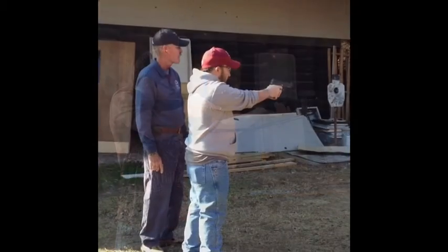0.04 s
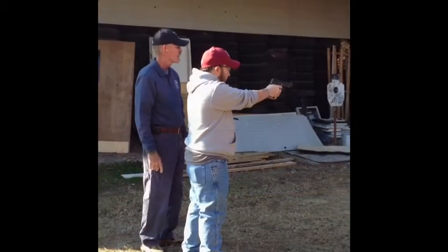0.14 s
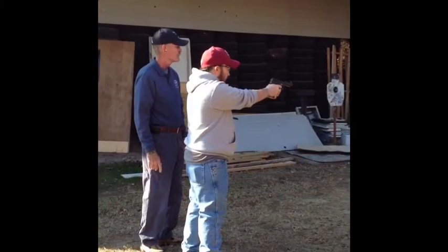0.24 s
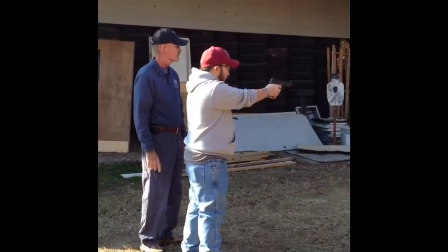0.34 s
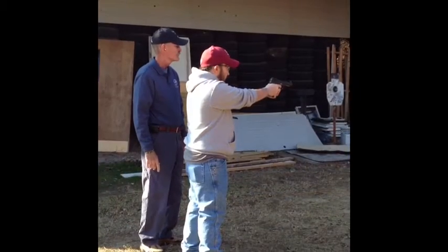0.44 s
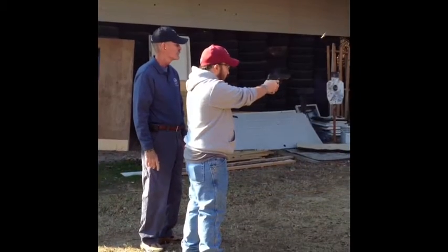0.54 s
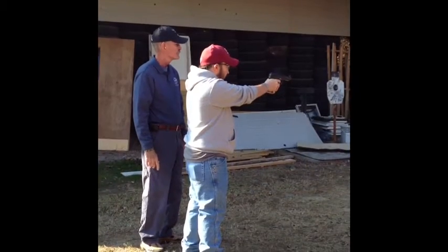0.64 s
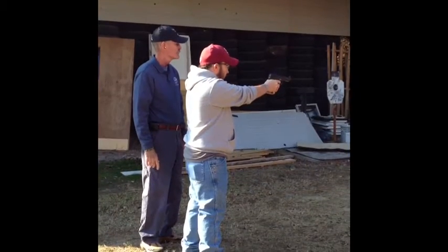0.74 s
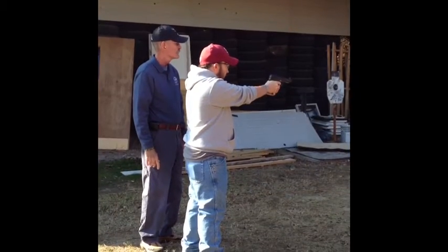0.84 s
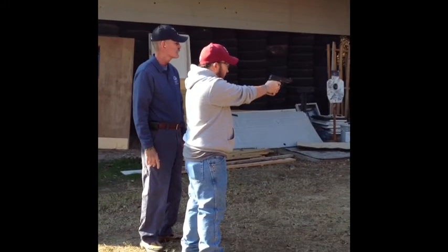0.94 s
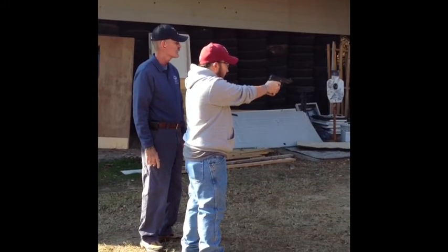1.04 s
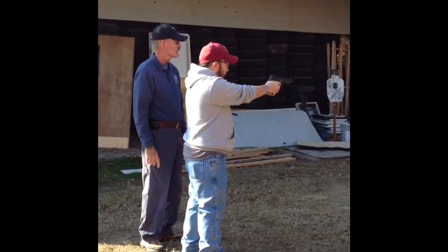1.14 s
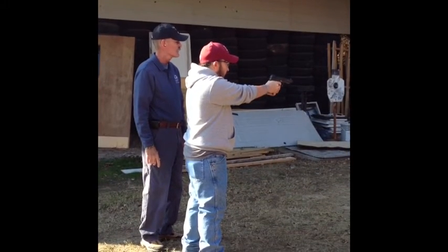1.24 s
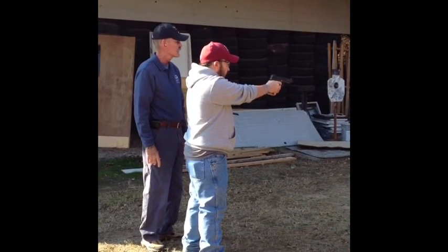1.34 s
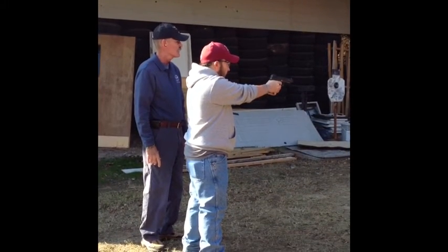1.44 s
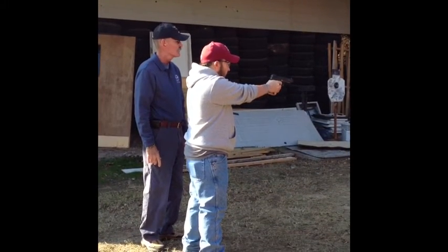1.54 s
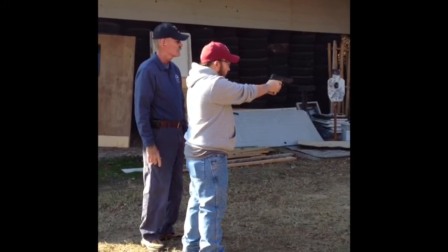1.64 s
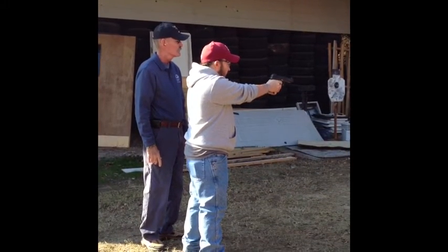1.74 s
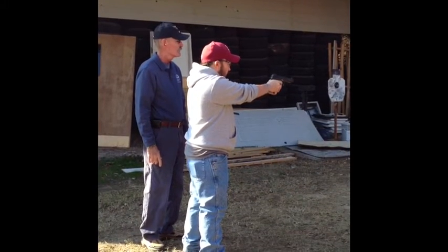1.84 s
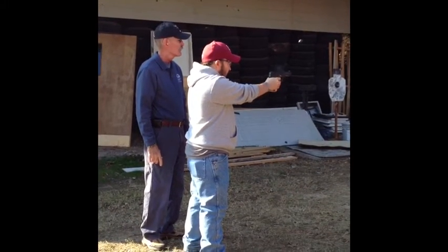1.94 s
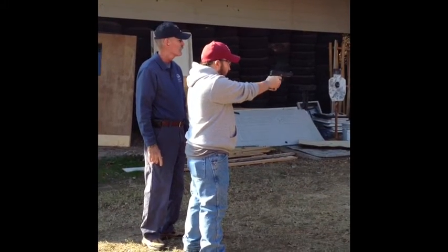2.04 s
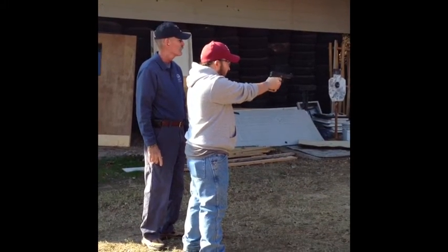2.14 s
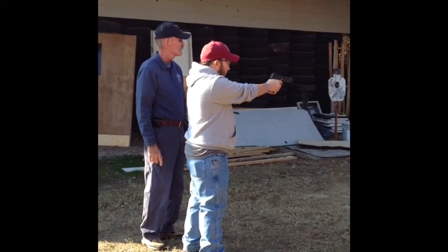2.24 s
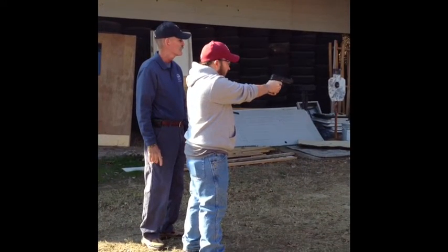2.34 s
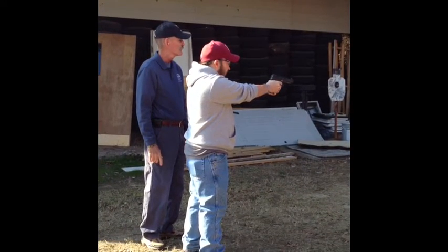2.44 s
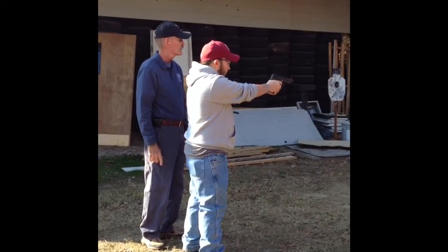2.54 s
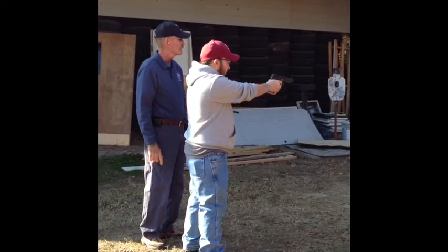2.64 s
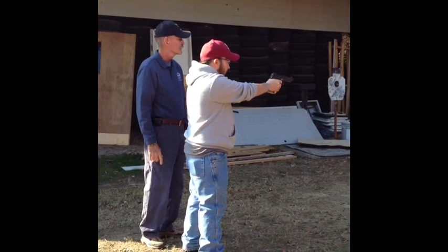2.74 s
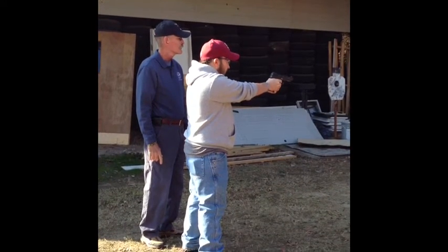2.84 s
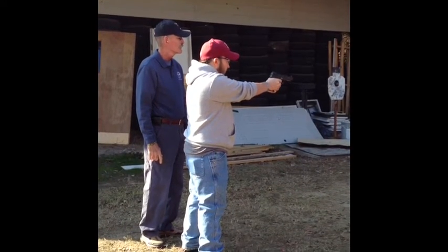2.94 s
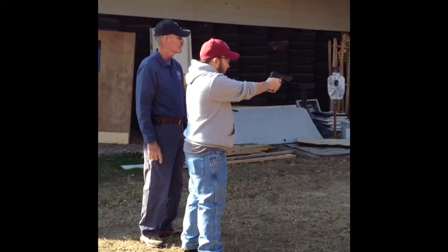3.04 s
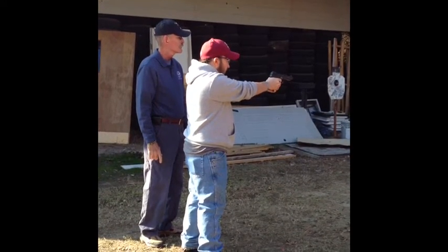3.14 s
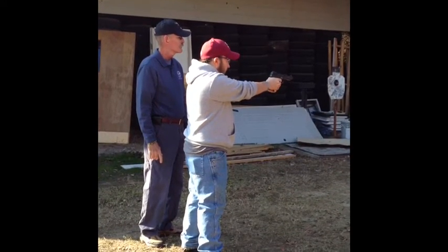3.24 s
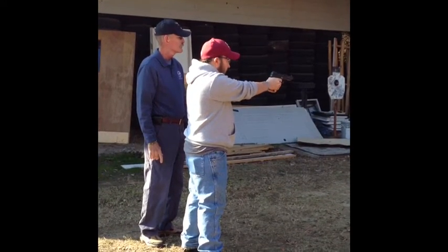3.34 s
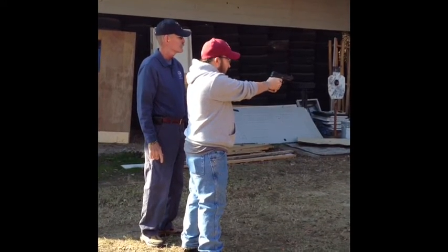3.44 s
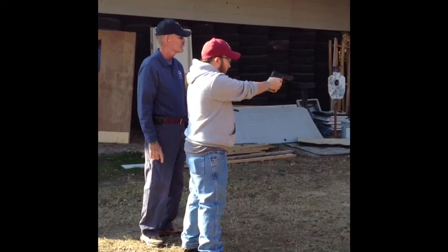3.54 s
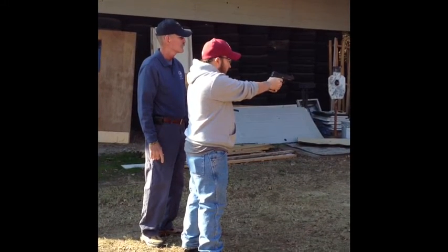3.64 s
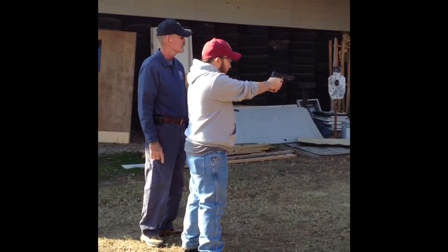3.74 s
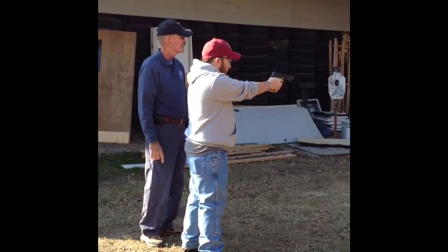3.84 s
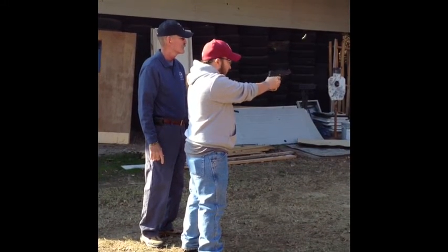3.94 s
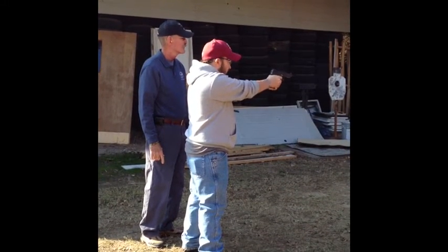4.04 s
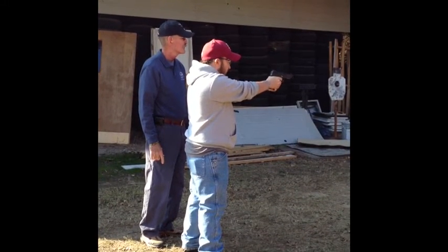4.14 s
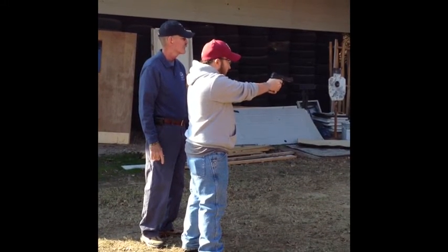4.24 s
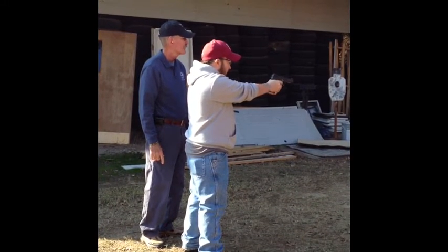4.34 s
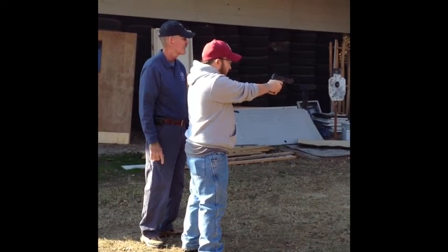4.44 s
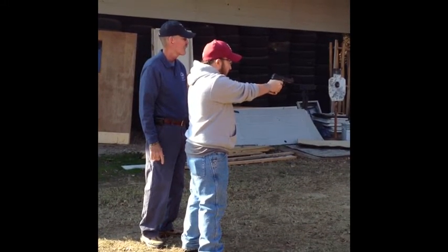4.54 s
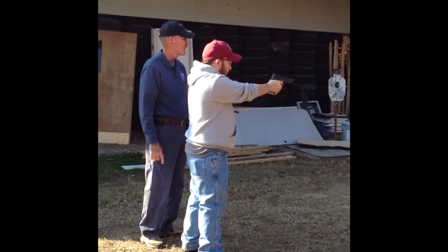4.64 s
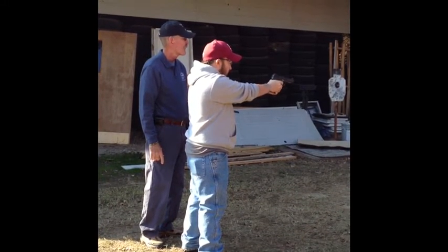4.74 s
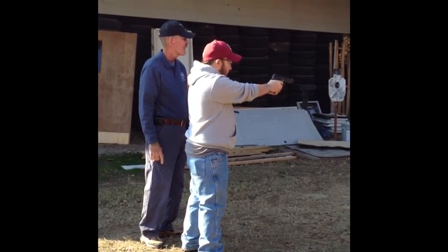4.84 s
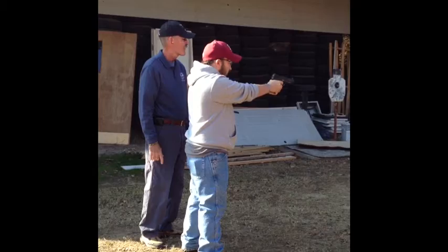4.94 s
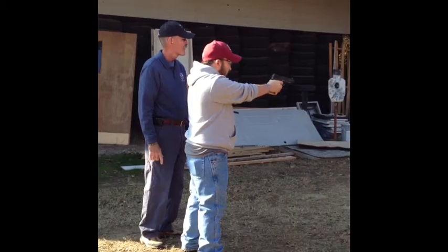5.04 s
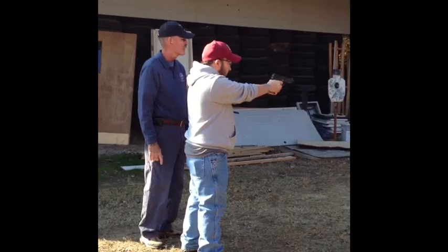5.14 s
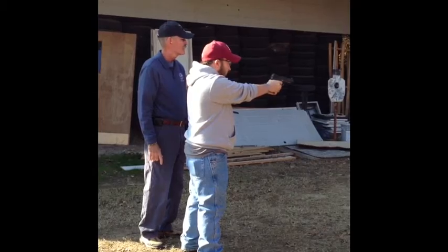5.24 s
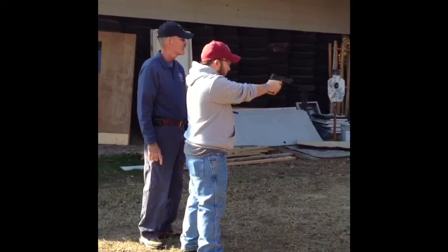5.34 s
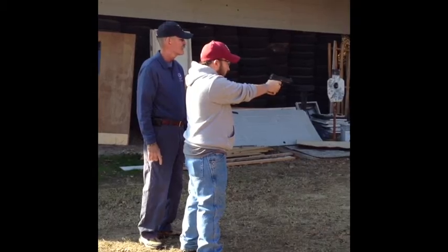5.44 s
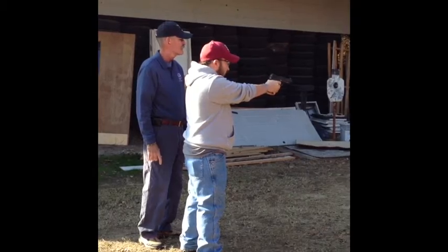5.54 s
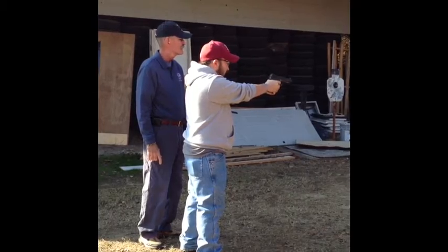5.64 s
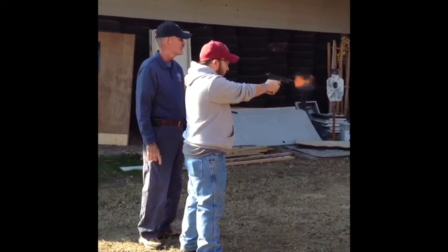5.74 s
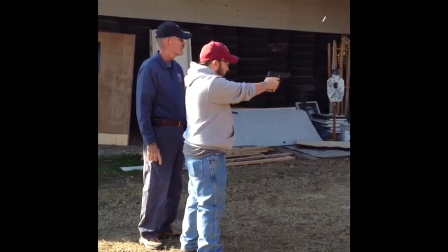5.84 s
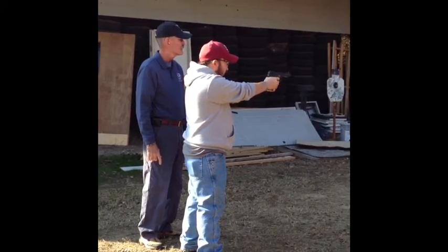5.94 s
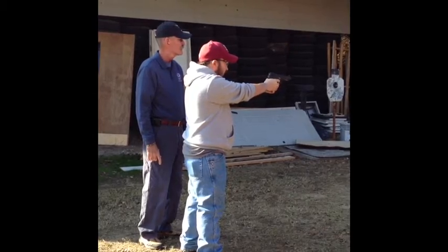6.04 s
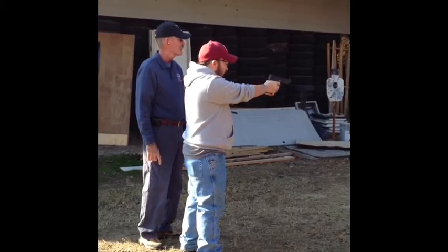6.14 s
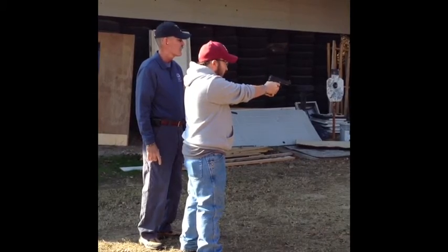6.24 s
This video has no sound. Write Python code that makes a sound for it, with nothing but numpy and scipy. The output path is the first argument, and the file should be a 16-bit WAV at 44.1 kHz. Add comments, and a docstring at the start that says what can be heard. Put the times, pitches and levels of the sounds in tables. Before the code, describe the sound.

A handgun fires four spaced shots on a quiet outdoor range, each loud crack trailed by a soft far-off echo.

```python
"""Outdoor range, in front of an open wooden shed: four pistol shots a few metres away.
Each muzzle blast bounces off the ground, slaps back from the shed, rings low in closely spaced echoes
and scatters round the yard; 0.4 s later a dull echo returns over the grass from the far side.
Between shots: near-still air, a faint drone, two soft knocks. Gain control ducks on each blast."""
import sys
import numpy as np
from scipy import signal
from scipy.fft import rfft, irfft
from scipy.io import wavfile
from scipy.ndimage import uniform_filter1d, minimum_filter1d

SR = 44100
rng = np.random.default_rng(int(sys.argv[2]) if len(sys.argv) > 2 else 0)


def inscribe(sig):
    """Save sig as 16-bit PCM at rate SR to the path in sys.argv[1].

    A 1-D sig is mono; a 2-D sig holds one channel per row.
    Samples are clipped to [-1, 1] before scaling.
    """
    pcm = np.round(np.clip(np.atleast_2d(sig).T, -1, 1) * 32767)
    wavfile.write(sys.argv[1], SR, pcm.astype(np.int16))


N = 277830
AGE_S = np.arange(int(1.5 * SR)) / SR  # time since an event's onset

# yard scatter spectrum: f/Hz, relative density/dB
YARD_SPECTRUM = [(30, -25), (75, -21), (125, -0.5), (280, 1.5), (470, -5.5), (780, -1), (1000, -4),
                 (1300, -13), (1650, -24.5), (2400, -25), (4000, -32), (7000, -34.5), (10000, -46.5),
                 (15000, -46.5)]


def muzzle_blast(crack_db, push_s=0.00019, body_hz=500, body_db=-4.5, front_db=-18, base_crack_db=-22):
    """Steep pressure front with suction behind it; a short bright crackle of overload on the front."""
    # blast resonances: f/Hz, width/Hz, boost/dB
    peaks = [(99, 45, 9), (153, 65, 13.5), (312, 130, 18), (828, 210, 17.5), (1295, 150, 6), (1815, 150, 6),
             (3160, 790, 6)]
    # crack spectrum: f/Hz, relative density/dB
    crack_spectrum = [(30, -2.5), (200, -0.5), (1200, 4.5), (1750, 4), (2500, -2), (3200, 0.5),
                      (5200, -1.5), (7500, -6.5), (10000, -22), (15000, -16)]
    phase = AGE_S / (push_s * from_db(rng.normal(0, .2)))
    front = (1 - phase) * np.exp(-np.minimum(phase, 60))
    front = signal.lfilter(*signal.butter(1, 40, "high", fs=SR), front + 1e-18)
    body = lowpass(front, body_hz)
    for hz, width_hz, boost_db in peaks:
        body = body + from_db(boost_db) * resonance(body, hz, width_hz)
    crack = noise(crack_spectrum) * swell(0, rise_s=.0001, t60_s=0.017)
    return from_db(body_db) * body + from_db(front_db) * front + from_db(base_crack_db + crack_db) * crack


def report(crack_db):
    """One blast with its discrete echoes: ground, shed, far side of the range."""
    # ground and close surfaces: delay/s, gain/dB, low-pass/Hz
    bounces = [(0.00252, -7.5, 11950), (0.00518, -1.5, 202.5)]
    # far-side echoes: delay/s, gain/dB, low-pass/Hz
    far_paths = [(0.3833, -42.5, 4500), (0.407, -28, 266), (0.4137, -32, 200)]
    blast = muzzle_blast(crack_db)
    near = blast + reflections(blast, bounces, highpass_hz=24.8)
    far = reflections(over_grass(near), far_paths, highpass_hz=189)
    return near + shed_echoes(near) + far


def shed_echoes(x, slap_s=.0209, slap_db=-8, slap_hz=1000, board_db=-11.5, board_hz=513):
    """The shed front slaps back first; boards and walls behind follow, duller and ever weaker."""
    gaps_s = .0034 * 1.172 ** np.arange(7)
    delays_s = slap_s + np.cumsum(gaps_s)
    boards = [(delay_s, board_db - 0.86 * k, board_hz) for k, delay_s in enumerate(delays_s)]
    return reflections(x, [(slap_s, slap_db, slap_hz)] + boards, highpass_hz=70)


def reflections(x, paths, highpass_hz):
    """Delayed, weaker, duller copies; the longest waves pass surfaces by."""
    out = np.zeros_like(x)
    returned = signal.sosfilt(signal.butter(2, highpass_hz, "high", fs=SR, output="sos"), x + 1e-18)
    for delay_s, gain_db, lowpass_hz in paths:
        add(out, delay_s, from_db(gain_db) * lowpass(returned, lowpass_hz))
    return out


def over_grass(x, dip_hz=790, thump_hz=390, air_hz=4000):
    """A long path low over grass absorbs the mids, favours a low thump and softens the top."""
    hollow = x - 0.74 * resonance(x, dip_hz, width_hz=420)
    thump = from_db(-1.5) * resonance(hollow, thump_hz, width_hz=170)
    return lowpass(hollow + thump, air_hz)


def echo_ring(gain_db=-1, arrival_s=.023, rise_s=0.0065):
    """Low pitched ringing of closely spaced echoes after each shot, as decaying sines."""
    # ring tones: f/Hz, relative level/dB, t60/s
    tones = [(116.3, -28, 0.099), (130, -24, 0.12), (166, -23, 0.22), (211.5, -21.5, 0.18),
             (239.3, -24, .22), (268.3, -18.5, 0.26), (332, -26, 0.14), (371.2, -31, 0.12),
             (636.6, -33, 0.31), (756, -27.5, 0.22), (823, -27, 0.12)]
    ring_s = np.maximum(AGE_S - arrival_s, 0)
    ring = sum(from_db(db) * np.sin(2 * np.pi * hz * ring_s) * swell(arrival_s, rise_s, t60_s)
               for hz, db, t60_s in tones)
    return from_db(gain_db) * ring


def yard_scatter(surfaces, gain_db=-25.5, early_db=-6, arrival_s=0.019, coherent_hz=2400,
                 base_t60_s=0.3, leak_hz=55):
    """Dense small reflections: lows repeat from shot to shot, moving air reshuffles the highs."""
    hz = np.fft.rfftfreq(len(AGE_S), 1 / SR)
    coherence = 1 / (1.02 + (hz / coherent_hz) ** 2)
    field = np.sqrt(coherence) * rfft(surfaces) + np.sqrt(1 - coherence) * rfft(noise(YARD_SPECTRUM))
    centres_hz = np.geomspace(50, 14000, num=9)
    out = 0
    for centre_hz, selector in zip(centres_hz, np.eye(len(centres_hz))):
        band = irfft(field * np.interp(np.log(hz + 1), np.log(centres_hz), selector), len(AGE_S))
        hold_s = .039 * .9 ** np.log2(centre_hz / 1000)
        yard_db_per_s = 60 / base_t60_s * (1 + leak_hz / centre_hz)  # lows leak out
        air_db_per_s = 65.5 * (centre_hz / 10000) ** 2  # air absorbs treble
        out = out + band * from_db(-(yard_db_per_s + air_db_per_s) * np.maximum(AGE_S - hold_s, 0))
    # only the ground scatters until the sound is back from the shed
    build_db = early_db * np.clip((arrival_s - AGE_S) / .003 + 1, 0, 1)
    onset = 1 - np.exp(-AGE_S / 0.0014)
    return out * from_db(gain_db + build_db) * onset


def distant_roll(country_db=-47, far_db=-51, linger_db=-67):
    """The report rolls over the land; scatter follows the far echo and lingers."""
    # open-country scatter: f/Hz, relative density/dB
    country_spectrum = [(40, -38), (90, -24), (150, -2), (280, 3.5), (450, -5), (1050, -6.5), (1500, -28),
                        (3000, -39.5), (15000, -63.5)]
    # far-side scatter: f/Hz, relative density/dB
    far_spectrum = [(40, -36), (90, -16.5), (140, 5.5), (300, 1.5), (480, -13.5), (1100, -15), (1500, -33),
                    (2500, -33.5), (15000, -70)]
    country = from_db(country_db) * noise(country_spectrum) * swell(0.076, rise_s=0.025, t60_s=0.88)
    far_side = from_db(far_db) * noise(far_spectrum) * swell(.412, rise_s=0.01, t60_s=0.4)
    linger = from_db(linger_db) * noise(country_spectrum) * swell(.42, rise_s=0.042, t60_s=1.9)
    return country + far_side + linger


def background(air_db=-65.5):
    """Still air and microphone hiss, with the drone and two soft, low knocks."""
    # air and hiss spectrum: f/Hz, relative density/dB
    air_spectrum = [(15, -58), (25, -24.5), (86, -11.5), (107, -8), (168, 1), (214, -7), (296, -3.5),
                    (408, -12.5), (506, -11), (913, -15), (1020, -16), (6660, -22.5), (9960, -30.5),
                    (13400, -21), (15300, -20.5)]
    # knocks: t/s, level/dB
    knocks = [(0.095, -49), (3.708, -56)]
    # knock spectrum: f/Hz, relative density/dB
    knock_spectrum = [(40, -18), (120, -1), (280, 7), (450, -4), (700, -13), (1200, -16), (1600, -34),
                      (15000, -60)]
    out = from_db(air_db) * noise(air_spectrum, size=N) + drone()
    for start_s, level_db in knocks:
        add(out, start_s, from_db(level_db) * noise(knock_spectrum) * swell(0, rise_s=.001, t60_s=0.03))
    return out


def drone(hz=187, width_hz=14, level_db=-78, swell_at_s=1.67, swell_width_s=.15, swell_db=11):
    """Faint, wavering distant tone that swells once."""
    tone = resonance(resonance(rng.standard_normal(N), hz, width_hz), hz, width_hz)
    bump = np.exp(-((np.arange(N) / SR - swell_at_s) / swell_width_s) ** 2)
    return unit_rms(tone) * from_db(level_db + swell_db * bump)


def gain_control(x, threshold_db=-8, slope=0.47, release_s=1.16, ahead_s=.002):
    """Each blast cuts the gain at once; the hiss creeps back over seconds."""
    wanted_cut_db = slope * np.maximum(20 * np.log10(np.abs(x) + 1e-9) - threshold_db, 0)
    recovery = np.exp(-np.arange(N) / SR / release_s)
    cut_db = np.maximum.accumulate(wanted_cut_db / recovery, axis=-1) * recovery
    window = 2 * int(ahead_s * SR) + 1
    gain_db = uniform_filter1d(minimum_filter1d(-cut_db, 2 * window), window)
    return x * from_db(gain_db)


def from_db(db):
    """Decibels to gain."""
    return 10 ** (np.asarray(db) / 20)


def unit_rms(x):
    """Scale to rms 1."""
    return x / np.sqrt(np.mean(x ** 2) + 1e-20)


def add(out, start_s, sound):
    """Mix in from start_s on."""
    at = max(round(start_s * SR), 0)
    out[at:at + len(sound)] += sound[:len(out) - at]


def lowpass(x, hz):
    """One-pole low-pass."""
    r = np.exp(-2 * np.pi * hz / SR)
    return signal.lfilter([1 - r], [1, -r], x + 1e-18)


def resonance(x, hz, width_hz):
    """Two-pole band-pass, peak gain 1."""
    r = np.exp(-np.pi * width_hz / SR)
    b = np.array([1, 0, -1]) * (1 - r * r) / 2
    a = [1, -2 * r * np.cos(2 * np.pi * hz / SR), r * r]
    return signal.lfilter(b, a, x + 1e-18)


def noise(spectrum, size=len(AGE_S)):
    """Coloured noise, rms 1; spectrum interpolated over log frequency."""
    knots_hz, knots_db = np.transpose(spectrum)
    hz = np.fft.rfftfreq(size, 1 / SR)
    level_db = np.interp(np.log(hz + 1), np.log(knots_hz), knots_db)
    return unit_rms(irfft(rfft(rng.standard_normal(size)) * from_db(level_db), size))


def swell(start_s, rise_s, t60_s):
    """Envelope: exponential rise and decay."""
    age_s = np.maximum(AGE_S - start_s, 0)
    return (1 - np.exp(-age_s / rise_s)) * from_db(-60 * age_s / t60_s)


def scene():
    """Shooter and microphone stay put, so every shot meets the same surroundings."""
    # shots: t/s, gain/dB, extra crack/dB
    shots = [(0.4929, 8.5, 0), (1.9126, 8, 0), (3.9094, 10, 1), (5.7692, 7.4, -0.5)]
    surfaces = noise(YARD_SPECTRUM)
    surroundings = echo_ring() + distant_roll()
    out = background()
    for start_s, gain_db, crack_db in shots:
        shot = report(crack_db) + yard_scatter(surfaces) + surroundings
        add(out, start_s, from_db(gain_db) * shot)
    return out[None]


def record(dry, ceiling=1.3, cutoff_hz=15300):
    """Gain control, soft clipping, steep low-pass."""
    held = gain_control(dry)
    rounded = held / (1 + (held / ceiling) ** 4) ** (1 / 4)
    return signal.sosfilt(signal.ellip(10, .1, 80, cutoff_hz, fs=SR, output="sos"), rounded)


dry = scene()
out = record(dry)
inscribe(out)
```